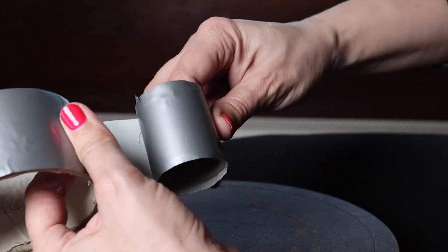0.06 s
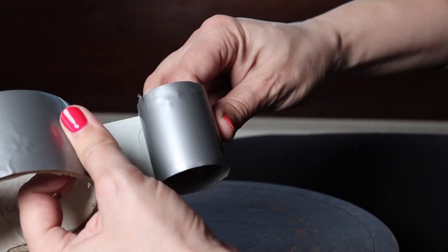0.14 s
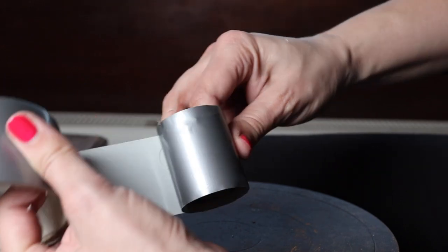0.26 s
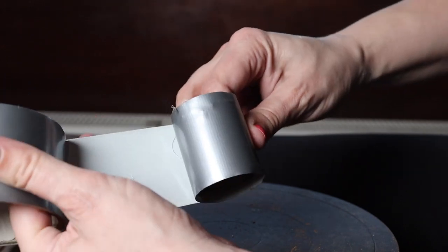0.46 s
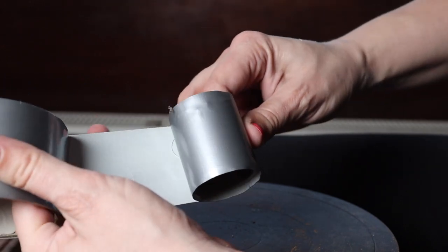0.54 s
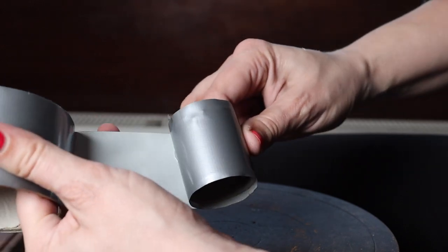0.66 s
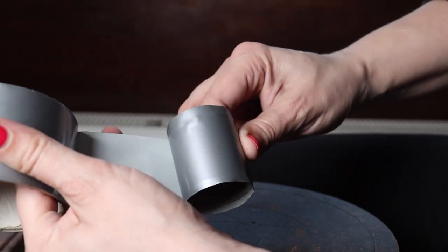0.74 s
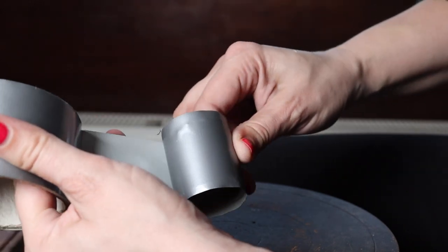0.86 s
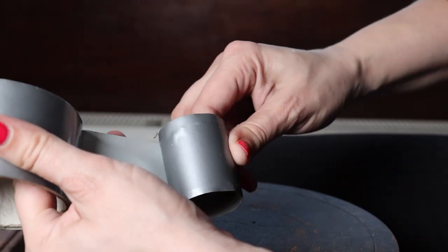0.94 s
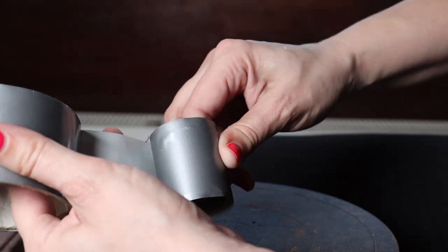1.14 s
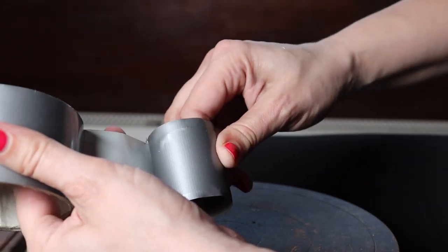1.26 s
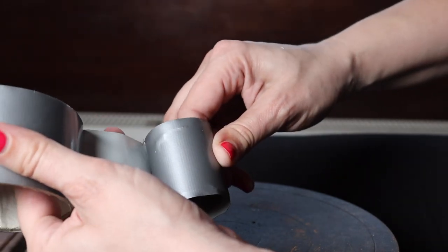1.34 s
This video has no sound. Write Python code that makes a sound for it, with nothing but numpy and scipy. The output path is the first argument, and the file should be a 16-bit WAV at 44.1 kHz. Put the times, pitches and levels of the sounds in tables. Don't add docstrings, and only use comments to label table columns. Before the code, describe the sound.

Sticky tape peels off a roll with faint crackles and two loud, sharp snaps in a bare room

```python
import sys
import numpy as np
from scipy import signal
from scipy.fft import rfft, irfft
from scipy.io import wavfile
from scipy.ndimage import uniform_filter1d

SR = 44100
rng = np.random.default_rng(int(sys.argv[2]) if len(sys.argv) > 2 else 0)


def persist_wave(psi):
    counts = np.round(np.clip(psi, -1, 1) * 32767).astype(np.int16)
    wavfile.write(sys.argv[1], SR, np.atleast_2d(counts).T)


def volts(x):
    e = np.asarray(x, float) / 20
    return 10 ** e


N = 61739
RING_T = np.arange(2048) / SR


def evened(x):
    return x / np.sqrt(np.mean(x ** 2) + 1e-20)


def read(points, hz):
    f, value = np.transpose(points)
    return np.interp(np.log(hz + 1), np.log(f + 1), value)


def ring(hz, width_hz, level_db):
    return volts(level_db) * np.exp(-np.pi * width_hz * RING_T) * np.sin(2 * np.pi * hz * RING_T)


def strike(start_s, sound):
    return np.r_[np.zeros(round(start_s * SR)), sound, np.zeros(N)][:N]


def paired(length, shape_db, same):
    frames = length // 256 + 5
    hz = np.fft.rfftfreq(1024, 1 / SR)
    a, b, c, d = rng.standard_normal((frames, 513, 4)).T
    like = np.clip(read(same, hz), -1, 1)[:, None]
    left = a + 1j * b
    right = like * left + np.sqrt(1 - like ** 2) * (c + 1j * d)
    level_db = shape_db(hz[:, None], np.arange(frames) * 256 / SR)
    spectra = np.array([left, right]) * volts(level_db)
    return signal.istft(spectra, nperseg=1024, noverlap=768)[1][:, :length]


def rumble():
    centre_hz, width_hz, level_db = 56.3, 18, -68
    hz = np.fft.rfftfreq(N, 1 / SR)
    band = 1 / (1 + (2 * (hz - centre_hz) / width_hz) ** 2)
    return volts(level_db) * evened(irfft(rfft(rng.standard_normal(N)) * band, N))


def air():
    # pitch_hz, level_db (per Hz)
    air_colour = [(30, -23.5), (52, -10.5), (110, -6.5), (300, -7.5), (650, -11), (1200, -18.5),
                  (8700, -26), (12000, -27)]
    # pitch_hz, likeness (-1 to 1)
    air_same = [(60, 0.93), (240, 0.55), (950, 0.29), (3770, -0.11), (15000, -0.03)]
    level_db = -56
    lumps_db = evened(uniform_filter1d(rng.standard_normal(N // 256 + 5), 5))

    def shape_db(hz, t):
        return read(air_colour, hz) + 0.5 * lumps_db / (1 + hz / 600)

    return volts(level_db) * evened(paired(N, shape_db, air_same))


def room(x):
    # pitch_hz, t60_s
    room_t60 = [(150, 0.75), (400, 0.61), (1000, 0.74), (3000, 0.59), (6000, 0.48), (11000, 0.33)]
    # pitch_hz, level_db
    room_colour = [(100, -8), (300, -7.5), (1000, 1.37), (3000, -3.35), (6000, -0.04), (11000, -1.5)]
    # pitch_hz, likeness (-1 to 1)
    room_same = [(60, 1.0), (240, 0.66), (950, 0.9), (3770, 0.042), (15000, 0.12)]
    # pitch_hz, level_db
    hall_colour = [(200, -19.5), (800, -15), (3000, -28.5), (8000, -36.5)]
    # delay_s, left_db, right_db
    echoes = [(.0016, -13.5, -20), (.0036, -25.5, -25), (.0056, -18, -16), (.0068, -18.5, -15.5),
              (.0079, -16, -20.5), (.0106, -21, -16), (.0142, -22.5, -20.5), (.0175, -27, -23)]
    tail_db, rise_s, hall_t60_s = -7, 0.003, 1.7
    scatter_s, scatter_db = .0013, 0.5

    def shape_db(hz, t):
        near_db = -60 * t / read(room_t60, hz)
        far_db = read(hall_colour, hz) - 60 * t / hall_t60_s
        return read(room_colour, hz) + np.maximum(near_db, far_db)

    tail = paired(SR, shape_db, room_same)
    tail = tail * (1 - np.exp(-(np.arange(SR) / SR / rise_s) ** 2))
    tail = volts(tail_db) * tail / np.linalg.norm(tail[0])

    early = np.zeros((2, SR))
    for k, (delay_s, left_db, right_db) in enumerate(echoes):
        at = round(delay_s * SR)
        early[0, at] = (-1) ** k * volts(left_db)
        early[1, at + 3 * (k % 3 - 1)] = (-1) ** k * volts(right_db)
    scatter = rng.standard_normal((2, 200)) * np.exp(-np.arange(200) / SR / scatter_s)
    scatter = np.c_[np.ones(2), volts(scatter_db) * scatter / np.linalg.norm(scatter[0])]
    early = signal.fftconvolve(early, scatter, axes=1)[:, :SR]
    return signal.fftconvolve(x, tail + early, axes=1)[:, :N]


def creep():
    # start_s, level_db
    creep_level = [(0, -63.5), (.06, -65.5), (0.074, -58), (.14, -54), (.155, -60), (.175, -50.5),
                   (.2, -56.5), (0.223, -51), (.232, -69.5), (.243, -71), (0.261, -67), (.9, -73.5),
                   (1.07, -88), (1.096, -74), (1.12, -60.5), (1.15, -69), (1.199, -69), (1.26, -76.5)]
    # pitch_hz, level_db
    creep_colour = [(530, -39.5), (900, -14), (2390, -12), (3100, -5), (6200, -10), (9560, -6.5),
                    (12000, -19), (15600, -56), (22000, -120)]
    ticks_per_s, spread_db = 940, 1.5
    sizes = volts(spread_db * np.minimum(rng.exponential(1, N), 4))
    ticks = sizes * (rng.random(N) < ticks_per_s / SR) * rng.choice([-1., 1.], N)
    colour_db = read([(300, -45)] + creep_colour, np.fft.rfftfreq(N, 1 / SR))
    coloured = irfft(rfft(ticks) * volts(colour_db), N)
    start_s, level_db = np.transpose(creep_level)
    return volts(np.interp(np.arange(N) / SR, start_s, level_db)) * evened(coloured)


def flap():
    # start_s, pitch_hz, width_hz, level_db
    span_modes = [
        (.2450, 860, 160, -11),
        (.2452, 1569, 221, -7.5),
        (.2447, 1200, 300, -15),
        (.2530, 295, 71, -8.5),
        (.2525, 400, 65, -10),
        (.2530, 520, 110, -18.5),
        (.2545, 115, 63, -22),
        (.4522, 200, 145, -25.5),
        (.4524, 1890, 576, -9),
        (.4522, 730, 600, -20.5),
    ]
    out = np.zeros(N)
    for start_s, hz, width_hz, level_db in span_modes:
        swell = np.minimum(RING_T * hz / .8, 1)
        out += strike(start_s, swell * ring(hz, width_hz, level_db))
    return out


def slips():
    # start_s, level_db, tilt_db (brightness per octave), pan_db (left over right)
    releases = [(0.2426, -18, -6, -1), (.2444, 8.5, 2.5, 2.5), (.2447, 9, 2.5, -0.4), (0.245, 4, 2.1, -1.3),
                (.2459, 6, -0.9, -1.5), (.2467, 2, 4.8, 2.3), (.2481, 3.5, .6, 3.7), (.2501, -6, 5.5, -4),
                (.2522, 0.5, 6.2, -0.3), (.4521, 4, 0.35, -0.5), (0.453, -5.5, 2.7, -3),
                (.0716, -43, 2.5, -0.3), (0.174, -30.5, -0.5, -3), (.2152, -34, 1.7, -0.5),
                (0.2368, -37, -9, -1.5), (.6405, -41, -23, -6), (1.0934, -40, 8.7, 1),
                (1.1155, -37.5, -15.5, -2.5), (1.1193, -41, -7, -2), (1.1238, -38.5, -13.5, -1),
                (1.1409, -45.5, -9, .1), (1.0863, -47, -3, -4), (1.1316, -43, -11, .1),
                (1.191, -40, -7.5, -4)]
    # pitch_hz, width_hz, level_db
    body = [(2027, 810, -8.5), (2610, 800, -10.5), (3746, 705, 0.47), (4606, 1200, -4), (6170, 940, -3.5),
            (7900, 1316, -1.5), (10650, 1300, -9)]
    paths = 3
    skew, lag_s = .04, .00006
    swell_s, radiate_hz = 0.00015, 463
    out = np.zeros((paths, 2, N))
    swell = 1 - np.exp(-(RING_T / swell_s) ** 2)
    signs = rng.choice([-1., 1.], (len(releases), len(body)))
    for j, (start_s, level_db, tilt_db, pan_db) in enumerate(releases):
        for side in (1, -1):
            sound = np.zeros(len(RING_T))
            for k, (hz, width_hz, mode_db) in enumerate(body):
                heard_hz = hz * (1 + skew * side * (-1) ** k)
                bright_db = mode_db + tilt_db * np.log2(hz / 3700)
                sound += signs[j, k] * ring(heard_hz, width_hz, bright_db)
            sound = volts(level_db + side * pan_db / 2) * swell * sound
            out[j % paths, (1 - side) // 2] += strike(start_s - side * lag_s / 2, sound)
    return signal.sosfilt(signal.butter(2, radiate_hz, "high", fs=SR, output="sos"), out)


def scene():
    tape = slips()
    tape[0] += flap()
    tape[1] += creep()
    return sum(path + room(path) for path in tape) + air() + rumble()


def starved(x):
    # pitch_hz, share_of_time
    dropouts = [(2500, .0), (4000, .07), (6000, .2), (9000, .24), (10800, .3), (11800, .6)]
    drop_db, spared_db = -20, -25
    hz, t, z = signal.stft(x, SR, nperseg=1024, noverlap=768)
    luck = rng.random((len(t) // 4 + 2, 47))
    luck = np.repeat(np.repeat(luck, 11, axis=1), 4, axis=0)
    luck = luck[2:len(t) + 2, :513].T
    luck = np.minimum(luck, np.roll(luck, 4, axis=1) * 2)
    spared = uniform_filter1d((abs(z) ** 2).sum((0, 1)), size=5) > volts(2 * spared_db)
    muted = (luck < read(dropouts, hz)[:, None] * 1.05) & ~spared
    lost = z * muted * (1 - volts(drop_db))
    return x - signal.istft(lost, SR, nperseg=1024, noverlap=768)[1][:, :N]


def roll_off(x):
    return signal.sosfilt(signal.butter(12, 17460, fs=SR, output="sos"), x)


def record(dry):
    edge_hz, splash_db = 11900, -26
    knee_db, squeeze, grab_s, recover_db_per_s = -9.5, 1, 0.0071, 120
    edge = signal.firwin(255, edge_hz, window=("kaiser", 9), fs=SR)[None]
    dull = signal.oaconvolve(dry, edge, "same")

    power = abs(uniform_filter1d((dull ** 2).mean(0), 101, origin=50))
    power_db = 10 * np.log10(power + 1e-12)
    fall_db = np.arange(N) * recover_db_per_s / SR
    held_db = np.maximum.accumulate(power_db + fall_db) - fall_db
    over_db = np.maximum(held_db - knee_db, 0)
    r = np.exp(-1 / (grab_s * SR))
    duck_db = squeeze * signal.lfilter([1 - r], [1, -r], over_db)

    clipped = np.clip(dull / volts(duck_db), -1, 1)
    splash = clipped - signal.oaconvolve(clipped, edge, "same")
    mix = starved(clipped - (1 - volts(splash_db)) * splash)
    return roll_off(np.clip(mix, -1, 1))


dry = scene()
out = record(dry)
persist_wave(out)
```